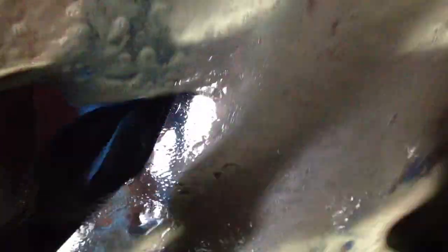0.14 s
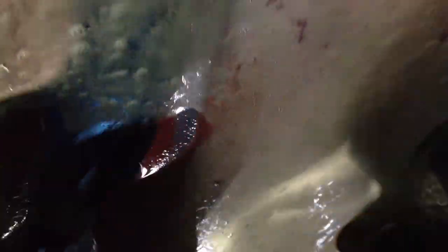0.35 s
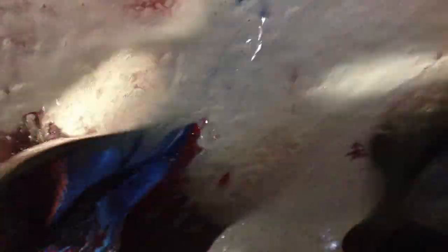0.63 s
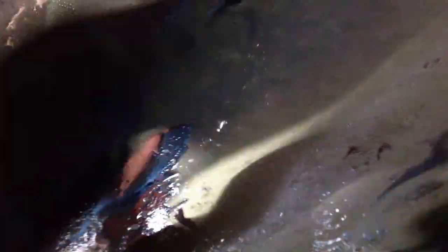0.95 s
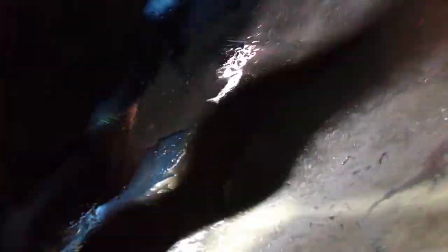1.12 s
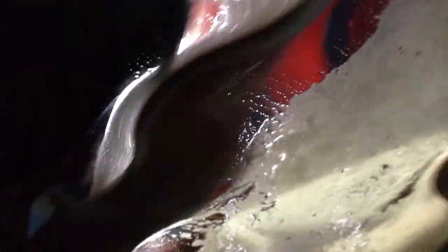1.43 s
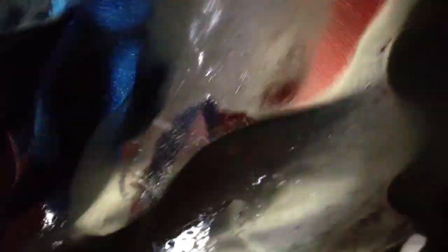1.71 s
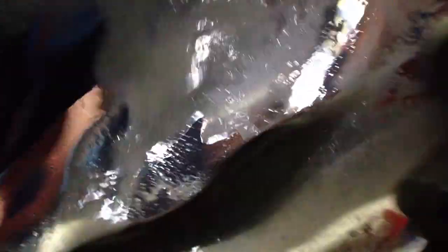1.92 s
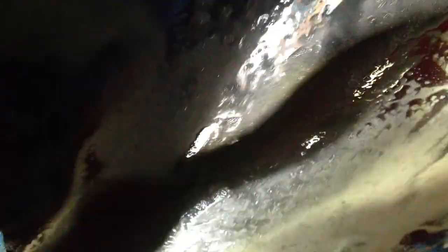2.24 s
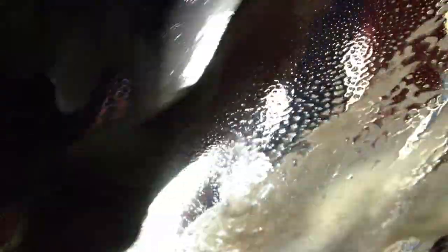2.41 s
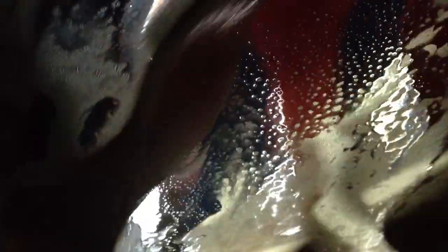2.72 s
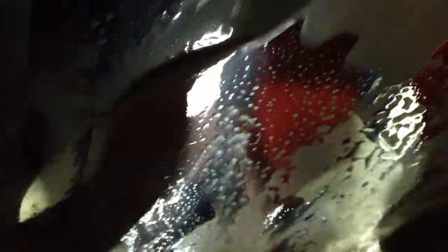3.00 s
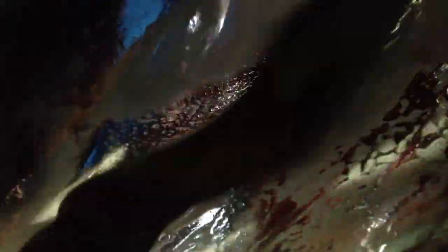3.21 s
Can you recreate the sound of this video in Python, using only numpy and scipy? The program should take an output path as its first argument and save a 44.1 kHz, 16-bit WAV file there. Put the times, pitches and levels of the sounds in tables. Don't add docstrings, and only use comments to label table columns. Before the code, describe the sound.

Wet wash-brush cloth slaps a car window rapidly over low machinery boom and running water.

```python
import sys
import numpy as np
from scipy import signal
from scipy.fft import rfft, irfft, next_fast_len
from scipy.io import wavfile
from scipy.ndimage import uniform_filter1d, map_coordinates

SR = 44100
rng = np.random.default_rng(int(sys.argv[2]) if len(sys.argv) > 2 else 0)


def dump(signal):
    limited = np.clip(np.atleast_2d(signal).T, -1, 1)
    pcm = np.round(limited * 32767).astype(np.int16)
    wavfile.write(sys.argv[1], SR, pcm)


def voltage_ratio(decibels):
    exponent = np.asarray(decibels, float) / 20
    return 10 ** exponent


N = 148176
T = np.arange(N) / SR

# frequency in Hz, bandwidth in Hz, gain in dB.
PANE_MODES = [(793, 10.5, 1.5), (900, 12, -10), (2220, 57, -2)]
SMACK_LINGERS = 1.3


def unit(x):
    return x / np.sqrt(np.mean(x ** 2) + 1e-20)


def wobble(rate):
    knots = rng.standard_normal(int(N * rate / SR) + 4)
    return map_coordinates(knots, [T * rate])


def shaped(x, points, peaks=()):
    m = next_fast_len(N + 8192)
    f = np.fft.rfftfreq(m, 1 / SR)
    hz, db = np.transpose(points)
    gain = voltage_ratio(np.interp(np.log(f + 1), np.log(hz), db, left=-120)) + 0j
    resonance = 1
    for centre, width, peak_db in peaks:
        damping = 1j * f * width
        resonance = resonance + voltage_ratio(peak_db) * damping / (centre ** 2 - f ** 2 + damping)
    return unit(irfft(rfft(x, m) * gain * resonance, m)[:N])


def patchy(depth_db):
    z = signal.stft(rng.standard_normal(N), nperseg=256)[2]
    field = uniform_filter1d(rng.standard_normal(z.shape), size=3, axis=0)
    field = uniform_filter1d(field, size=6, axis=1)
    return unit(signal.istft(z * voltage_ratio(depth_db * unit(field)), nperseg=256)[1][:N])


def droplets(depth_db):
    drops_per_s, spread_db, drop_share = 6000, 2.5, 0.29
    chance, sign, size = rng.random((3, N))
    falls = chance < drops_per_s / SR
    drops = falls * np.sign(sign - .5) * voltage_ratio(-spread_db * np.log(size + 1e-4))
    return np.sqrt(drop_share) * unit(drops) + np.sqrt(1 - drop_share) * patchy(depth_db)


def pressure():
    # time in seconds, boom in dB, running water in dB, mist in dB.
    brush_press = [
        (0, -28.5, -35, -2.5),
        (.8, -29, -37.5, 0.5),
        (1.5, -27.5, -34.5, 0.5),
        (2.72, -27, -36.5, -1),
        (2.84, -28, -38.5, -10),
        (3.2, -27, -35.5, -6),
    ]
    s, *levels = np.transpose(brush_press)
    return [np.interp(T, s, level) for level in levels]


def contact(lingers, smack):
    # contact in seconds, swell in ms, peak in dB, fall in ms
    # per 6 dB, glass smack over spray in dB. Cloth slaps on the glass, some doubled by a second contact close
    cloth_slaps = [(0.057, 14.4, -31, 15.5, 2.5), (0.115, 12, -41.5, 15, 5), (0.151, 6, -30.5, 20, -2.5),
                   (0.182, 3.6, -30, 12, -1), (0.266, 23.5, -30, 16.5, -3.5), (0.372, 25, -35.5, 14.5, 4.5),
                   (0.486, 37, -29.5, 4, -5.5), (0.573, 16, -31, 11, 1), (0.703, 28, -29.5, 8.5, -0.5),
                   (0.754, 5.3, -35, 13, -11), (0.842, 15, -25.5, 12, -5.5), (0.943, 22, -28.5, 7.5, -7),
                   (1.052, 24.5, -31.5, 14, -3.5), (1.114, 35, -38, 20, -4), (1.168, 9.7, -29, 14.5, -5.5),
                   (1.257, 13, -36, 14, 7), (1.497, 28, -26.5, 5.5, 0), (1.574, 19, -44, 9, 11),
                   (1.62, 18.5, -32.5, 27, 3), (1.711, 11, -32.5, 28, -2), (1.7355, 4, -23, 10.5, -8.5),
                   (1.808, 18, -41, 2.5, 16), (1.856, 11, -28, 17, -2.5), (1.906, 4.3, -41, 13.5, 14.5),
                  (1.981, 8, -30, 17, 1.5), (2.024, 9, -40, -5, 13), (2.075, 5, -30.5, 15, 0),
                  (2.163, 50, -33, 10, 3.5), (2.264, 13, -46, 9.5, 21.5), (2.329, 12.6, -29.5, 17, 4),
                  (2.442, 17, -29.5, 21, -6.5), (2.499, 9.9, -32.5, 6, 10.5),
                  (2.598, 13.6, -26.5, 8.5, 0.5), (2.676, 4.5, -32, -5, -12), (2.736, 13.7, -26, 4, 3),
                  (2.781, 14.4, -38.5, 7, 8), (2.845, 5, -38, 23, 3.5), (2.951, 6.5, -38, 4, 10),
                  (3.011, 16, -44.5, 28, 4.5), (3.08, 20, -43.5, 6, 13.5), (3.167, 3.5, -34.5, 8, 6.5),
                  (3.188, 12, -42.5, 18, 3), (3.238, 4, -36.5, 8, 3), (3.305, 4.2, -29, 4.5, -1),
                   (0.477, 17, -32.5, 17, 1),
        (0.703, 3.2, -31, 2, -4),
        (.92, 6.3, -39, 17, -2),
        (1.382, 1.6, -30, 9, -14),
        (1.393, 6.4, -28, 12, -0.5),
        (1.46, 13, -45, 14, 10),
        (2.328, 2.5, -31.5, 7, -16),
        (2.569, 5, -43.5, 41, 5),
        (2.862, 9, -42, 4, 4),
        (2.9, 8.9, -46, 16, 8),
                   (.604, 22, -30, 9, 4),
    ]
    further_strokes = [(0.001, 2, -54.5, 30, 7), (.04, 12, -45, 12, 8), (.215, 10, -48.5, 30, 7),
                       (.66, 10, -55, 23, 14), (.785, 20, -49.5, 30, 9), (1.026, 4, -41.5, 22, 2),
                       (1.2, 16, -45, 23, 2), (1.285, 15.5, -33.5, 11, 7), (1.318, 12, -41.5, 11, 10),
                       (1.422, 12, -38, 3, 5), (1.601, 5, -36.5, 13, 9.5), (1.78, 10, -49, 20, 13),
                       (3.152, 4.6, -45, 9, 11), (3.256, 8, -47, 9, 9)]
    end_snaps = [
        (0.153, 1.5, -28.5, 4, 3),
        (0.391, 3.3, -30.5, 6, 7),
        (1.747, 3, -27, 6, -9),
        (1.866, 4, -30.5, 4, -11),
        (2.606, 5, -30.5, 3.5, 0),
        (2.721, 3, -42, 5, -4),
        (2.844, 1.8, -31.5, 4.5, -3),
        (3.2132, 3, -33.5, 9.5, 1.5),
        (3.289, 3, -45, 5, 1),
        (3.304, 1.5, -31, 4.5, -28.5),
    ]
    landing_db, touch_ms, soft_ms = 9.5, 0.47, 21
    reverb_ms, reverb_db = 6.7, -6
    power = np.zeros(N)
    for s, swell, db, fall, extra_db in cloth_slaps + further_strokes + end_snaps:
        near = slice(max(round((s - .05) * SR), 0), round((s + .25) * SR))
        ms = (T[near] - s) * 1000
        swell = max(swell, 1)
        landing = 6 * np.clip(-ms / (touch_ms * (1 + (swell / soft_ms) ** 3)), 0, 30)
        rise = landing_db * np.clip(1 - ms / swell, 0, 1) + landing
        decay = 6.27 * np.clip((ms - swell) / max(fall * lingers, 2), 0, 30) ** 1.42
        power[near] += voltage_ratio(2 * (db + smack * extra_db - rise - decay))
    keep = np.exp(-1000 / (SR * reverb_ms))
    reverberant = signal.lfilter([1 - keep], [1, -keep], power)
    return np.sqrt(power + voltage_ratio(2 * reverb_db) * reverberant)


def slaps():
    # frequency in Hz, level in dB per Hz.
    spray_tone = [(2500, -5.5), (4300, -9.5), (5300, -3.5), (7300, -3.5), (9000, -16), (10500, -24),
                  (15000, -35)]
    # frequency in Hz, level in dB per Hz.
    mist_tone = [(8000, -1.5), (9500, -9.5), (14200, -6), (15300, -19)]
    # frequency in Hz, level in dB per Hz.
    smack_tone = [(400, -8.5), (800, -4.5), (1400, -7.5), (2100, -2.5), (3100, -3), (4000, -13),
                  (6000, -27.5)]
    clumps = voltage_ratio(1.6 * wobble(260))
    drops = droplets(2.4)
    spray = contact(0.95, smack=0) * shaped(drops, spray_tone)
    mist_level = contact(0.84, smack=-0.48) ** 1.286 * voltage_ratio(-5 + pressure()[2])
    mist = mist_level * shaped(drops, mist_tone)
    smack = contact(SMACK_LINGERS, smack=0.62) * voltage_ratio(0.74 * wobble(45))
    return clumps * (spray + mist) + smack * shaped(droplets(0.9), smack_tone, PANE_MODES)


def boom():
    # frequency in Hz, level in dB per Hz.
    boom_tone = [(30, -30.5), (70, -30), (105, -18.5), (220, -14), (480, -17.5), (700, -25), (1500, -35),
                 (4000, -106)]
    # frequency in Hz, bandwidth in Hz, gain in dB.
    body_modes = [(155.6, 59, 15.5), (293.2, 42, 6.5), (354.6, 70, 5)]
    level = voltage_ratio(pressure()[0] + 0.5 + 1.38 * wobble(9.16))
    return level * shaped(patchy(2.46), boom_tone, body_modes)


def water():
    # frequency in Hz, level in dB per Hz.
    water_tone = [(500, 0.5), (1000, 3), (2500, -4.5), (4000, -12.5), (8000, -19), (15000, -37)]
    sheet = shaped(patchy(2.2), water_tone, PANE_MODES)
    push = unit(contact(SMACK_LINGERS, smack=0.95) ** 0.26 + 0.085)
    return voltage_ratio(pressure()[1] + 2.97 * wobble(20)) * push * sheet


def jets():
    # frequency in Hz, level in dB per Hz.
    jet_tone = [(3000, -5), (7000, 0), (9500, -11), (15300, -11)]
    return voltage_ratio(-58.5) * shaped(droplets(2.5), jet_tone)


def drum(s, db, hz, ms, turn, rattle):
    d = np.clip((T - s) * 1000 / (0.59 * ms + 3), -6, 6)
    envelope = voltage_ratio(db + 1.5 - 7.2 * np.abs(d) ** 3.3)
    tone = np.sin(2 * np.pi * (hz * (T - s) + turn))
    return envelope * (tone + rattle)


def panels():
    # time in seconds, level in dB, pitch in Hz, length in ms.
    door_blows = [(0.099, -24, 167.8, 80), (0.184, -25, 173, 38), (0.316, -21, 158, 8.5),
                  (0.427, -26.5, 166.7, 97), (0.938, -20, 166, 36), (1.039, -17.5, 174, 6.3),
                  (1.125, -25, 178, 71), (1.411, -25.5, 166, 22), (1.472, -23.5, 181, 19),
                  (1.577, -30.5, 165, 190), (1.802, -22.5, 167.4, 39), (1.927, -15.5, 151.4, 32),
                  (2.046, -20, 151, 30), (2.193, -19.5, 149, 37), (2.294, -21, 137, 32),
                  (2.362, -14, 142, 23), (2.512, -17, 146, 18), (2.662, -15.5, 144.4, 26.5),
                  (2.803, -17, 150, 34), (3.12, -23.5, 187, 20)]
    # time in seconds, level in dB, length in ms.
    roof_blows = [
        (1.596, -24, 23),
        (1.693, -22.5, 34),
        (1.939, -22, 34),
        (2.358, -22.5, 20),
        (2.512, -23, 14),
        (2.803, -24.5, 18),
        (2.904, -23, 14),
        (3.083, -24, 19),
    ]
    # frequency in Hz, level in dB per Hz.
    rattle_tone = [(200, -10), (300, 14), (550, 6), (950, -3.5), (2500, -35.5)]
    roof_hz, roof_scatter = 361.3, 0.039
    rattle = voltage_ratio(-13) * shaped(patchy(2.2), rattle_tone)
    out = np.zeros(N)
    for s, db, hz, ms in door_blows:
        out += drum(s, db, hz, ms, rng.random(), rattle)
    for s, db, ms in roof_blows:
        hz = roof_hz * (1 + roof_scatter * rng.uniform(-1, 1))
        out += drum(s, db, hz, ms, rng.random(), rattle)
    return out


def pane():
    # time in seconds, level in dB, pitch in Hz, length in ms.
    pane_songs = [(1.215, -36, 900, 36), (1.33, -35, 905, 49), (1.485, -34, 898, 28),
                  (1.492, -35.5, 790, 26), (1.575, -36.5, 1377, 24), (1.7, -36.5, 530, 29),
                  (1.744, -35, 915, 35), (1.82, -34.5, 783, 42), (3.25, -39, 799, 60), (.69, -39, 1010, 45),
                  (1.385, -39, 1096, 30)]
    # time in seconds, level in dB, pitch in Hz, length in ms.
    light_blows = [(.345, -25.5, 165, 19), (.52, -25, 172, 23), (.625, -29, 295, 24), (.76, -27, 159, 30),
                   (1.245, -24.5, 165, 61), (1.32, -28, 158, 30), (1.52, -25, 160, 26),
                   (2.865, -24.5, 151, 32), (3.19, -26.5, 310, 19), (3.215, -26.5, 137, 30),
                   (3.275, -25, 145, 23), (3.3, -28.5, 287, 47), (3.325, -27.5, 166, 24)]
    return sum(drum(*row, rng.random(), 0) for row in pane_songs + light_blows)


def scene():
    return (slaps() + boom() + water() + jets() + panels() + pane())[None]


def low_pass(x):
    return signal.sosfilt(signal.butter(12, 16270, fs=SR, output="sos"), x)


def record(dry):
    top_hz, edge_hz = 15270, 14
    f = np.fft.rfftfreq(N, 1 / SR)
    lowpass = 1 - np.tanh((f - top_hz) / (2 * edge_hz))
    skirt = voltage_ratio(-24 - np.abs(f - top_hz) / 30)
    mix = irfft(rfft(dry) * (lowpass + skirt) / 2, N)
    return low_pass(mix)


dry = scene()
out = record(dry)
dump(out)
```